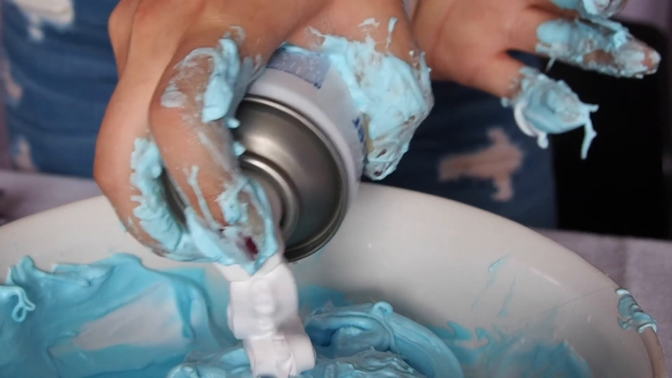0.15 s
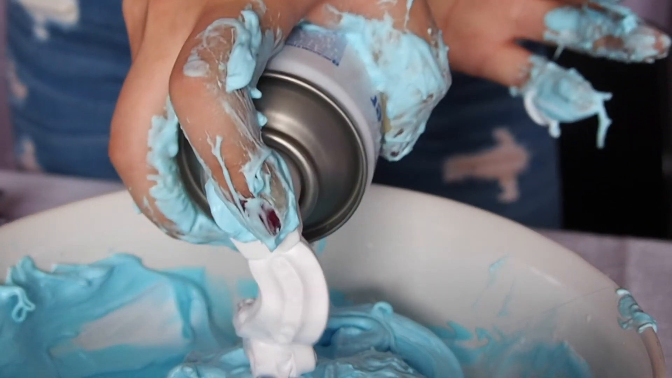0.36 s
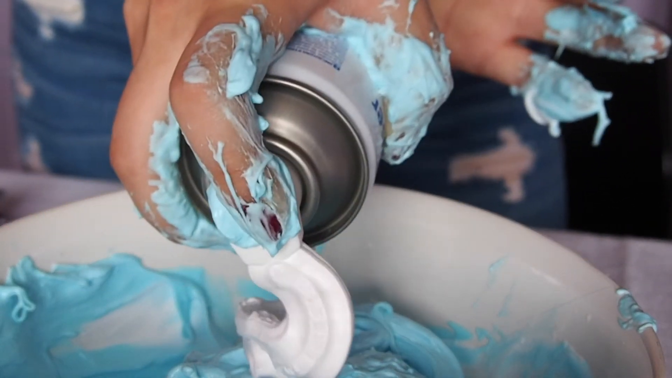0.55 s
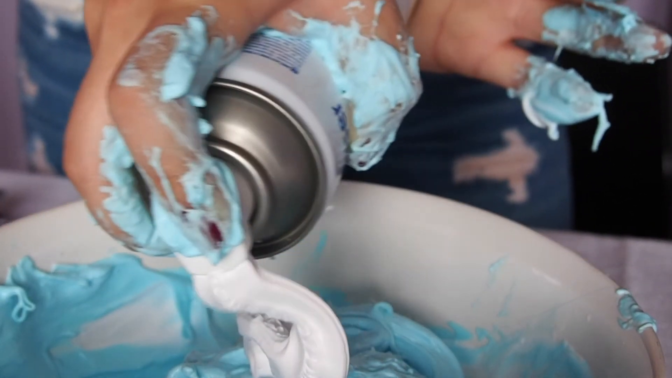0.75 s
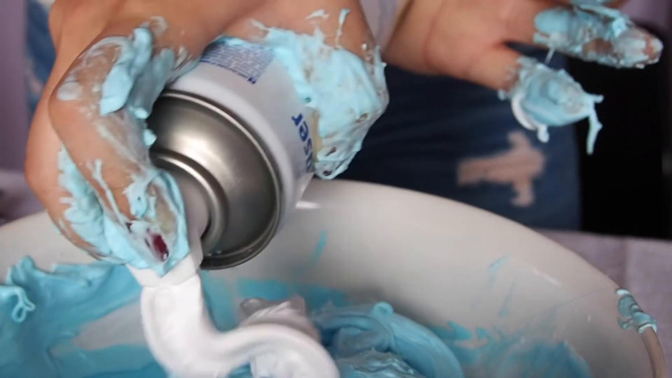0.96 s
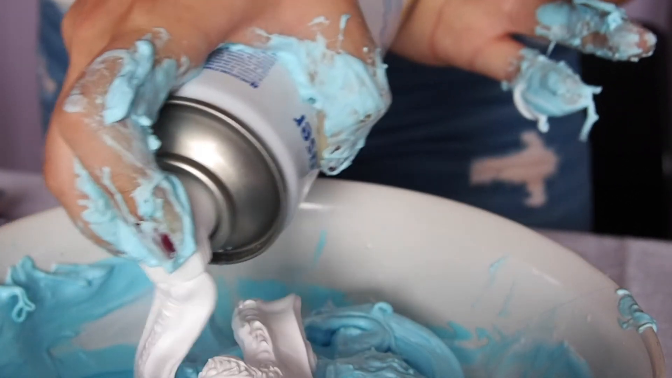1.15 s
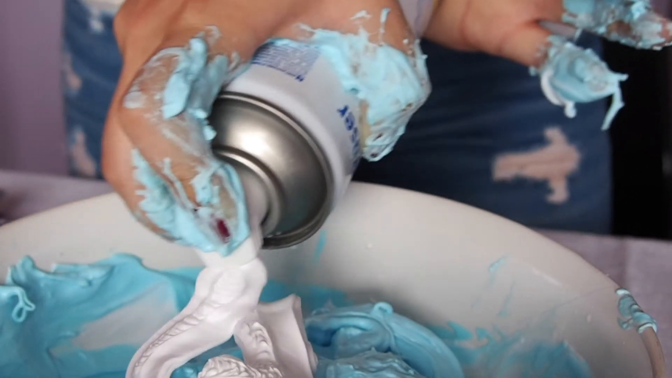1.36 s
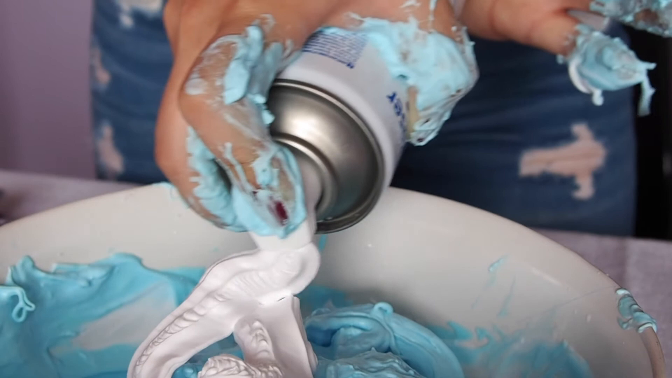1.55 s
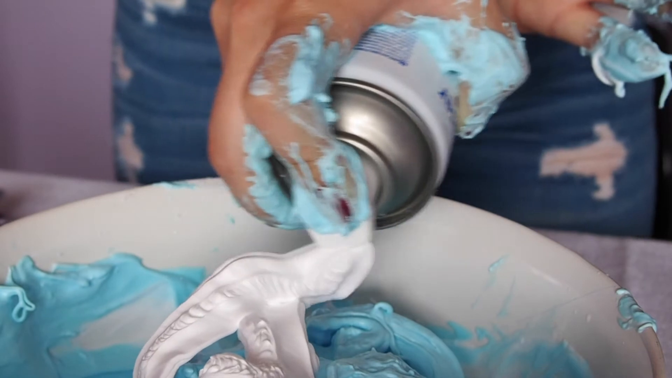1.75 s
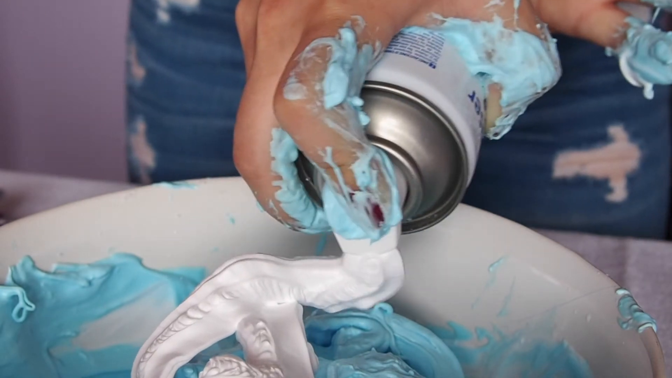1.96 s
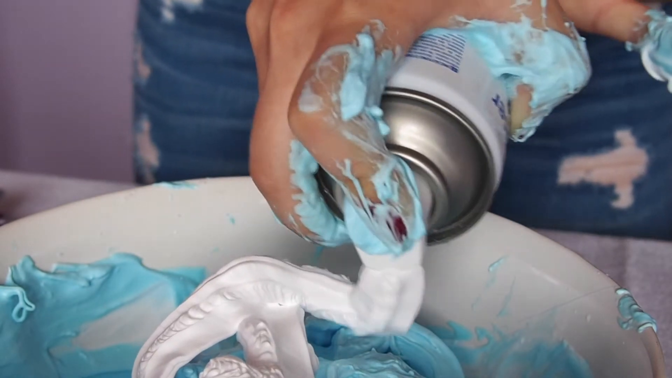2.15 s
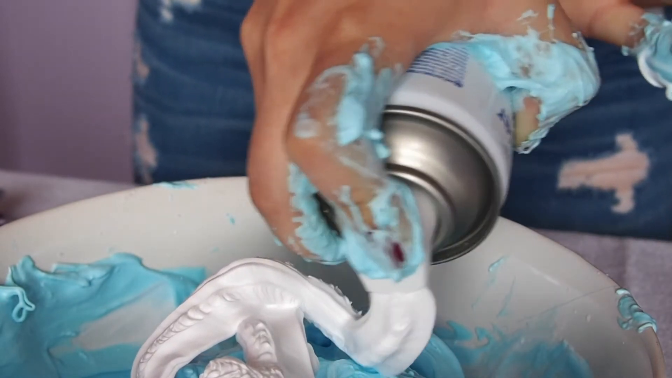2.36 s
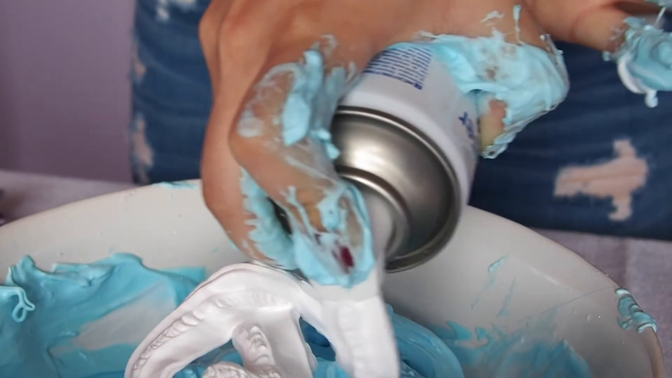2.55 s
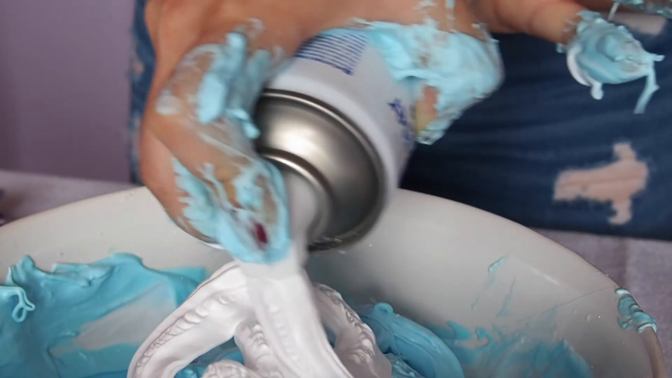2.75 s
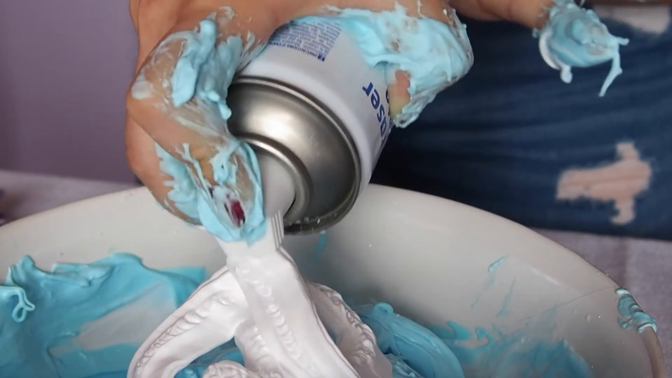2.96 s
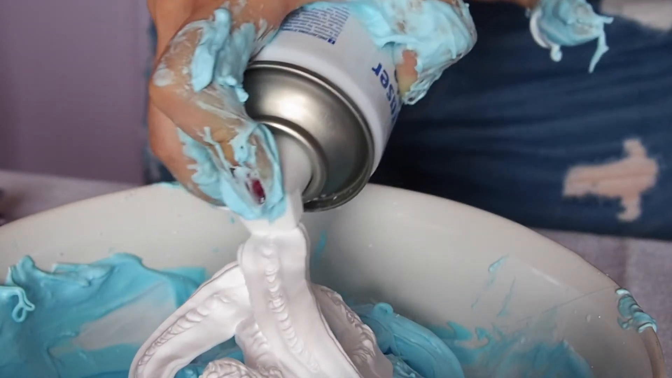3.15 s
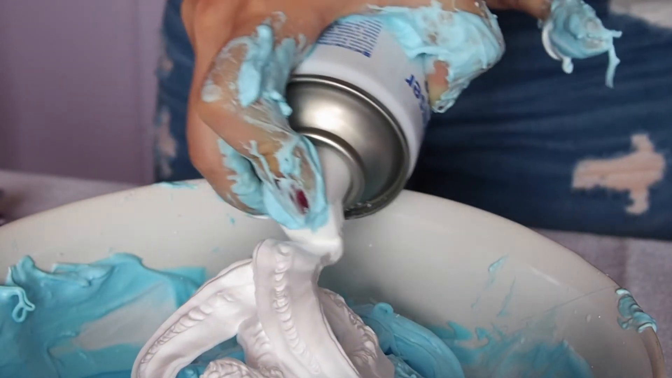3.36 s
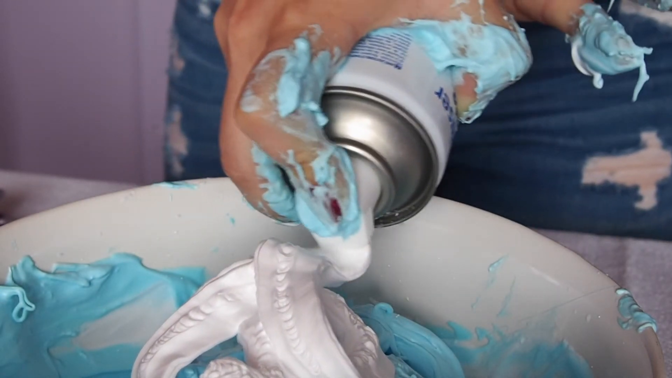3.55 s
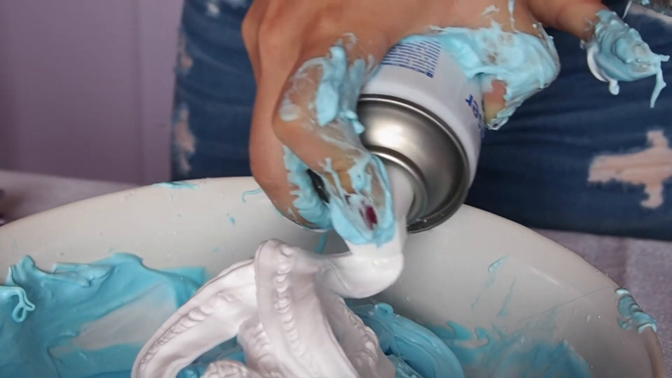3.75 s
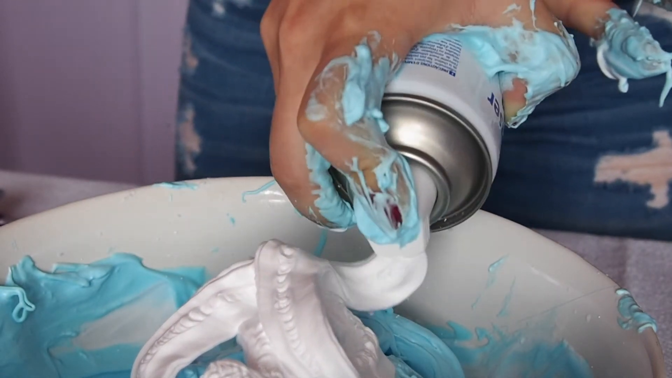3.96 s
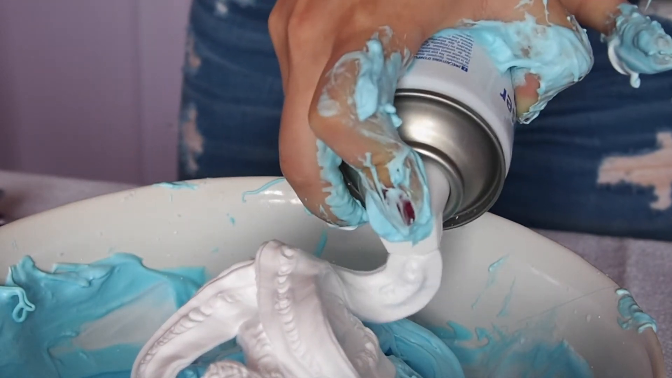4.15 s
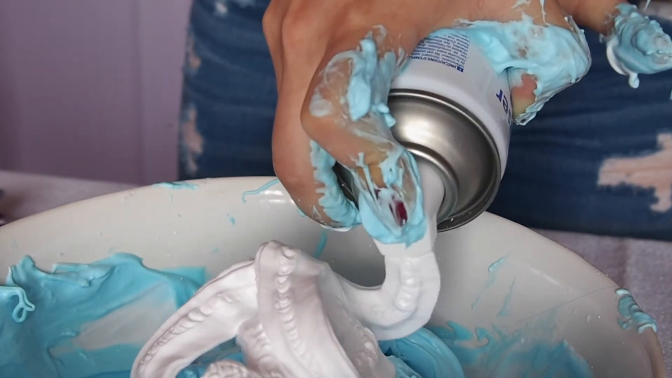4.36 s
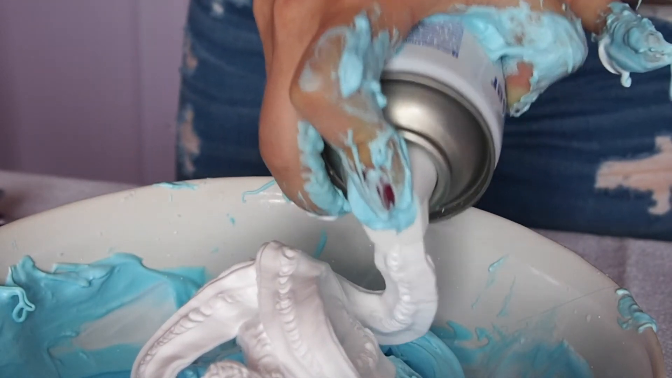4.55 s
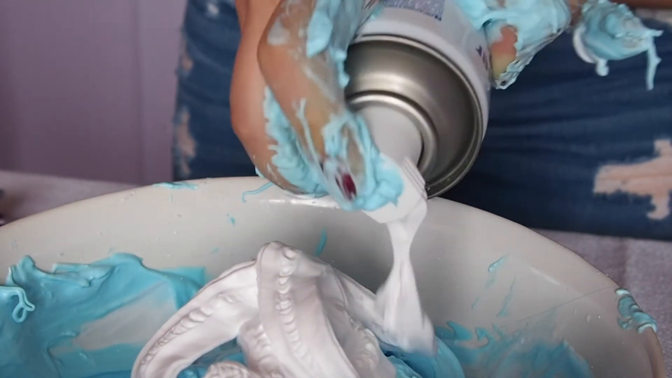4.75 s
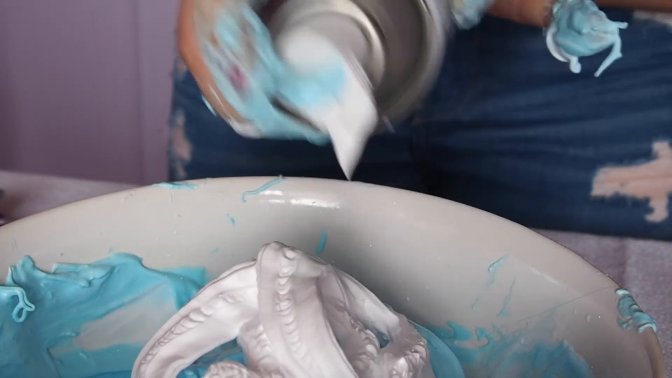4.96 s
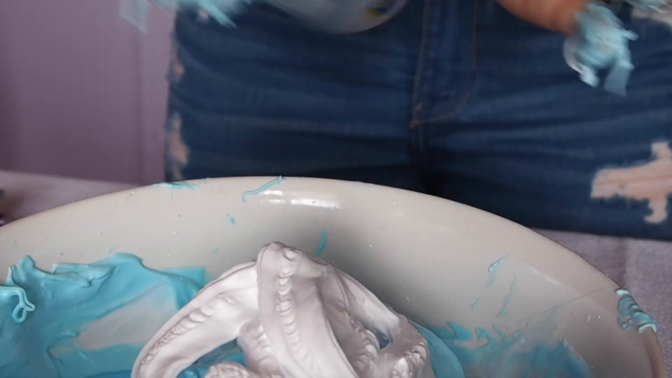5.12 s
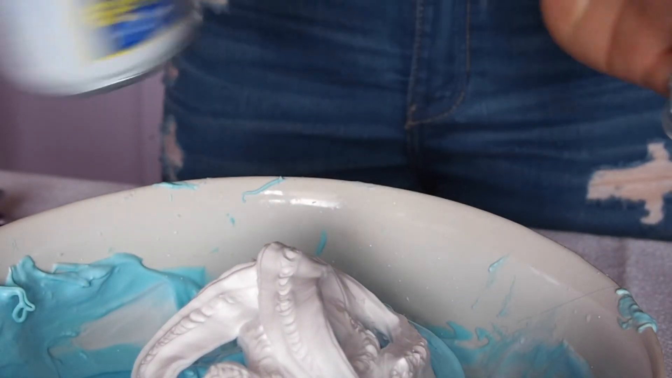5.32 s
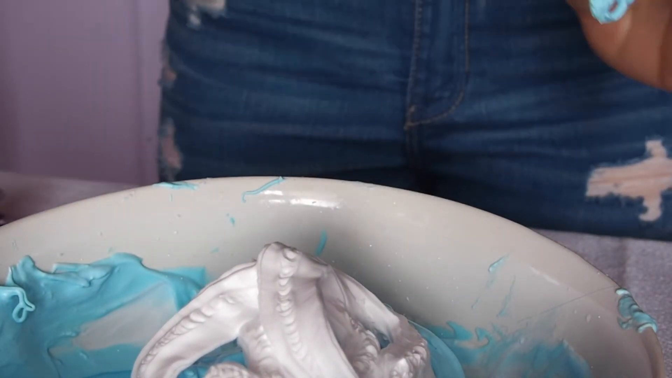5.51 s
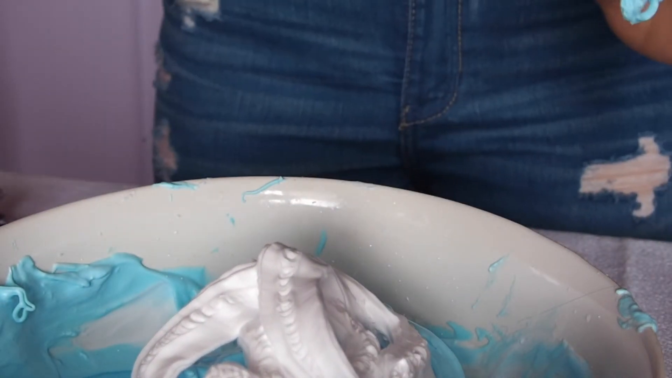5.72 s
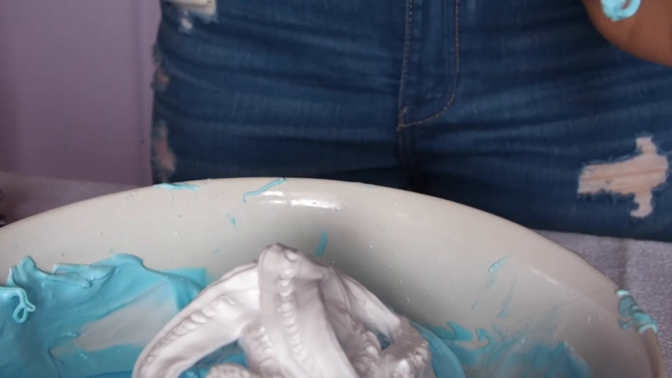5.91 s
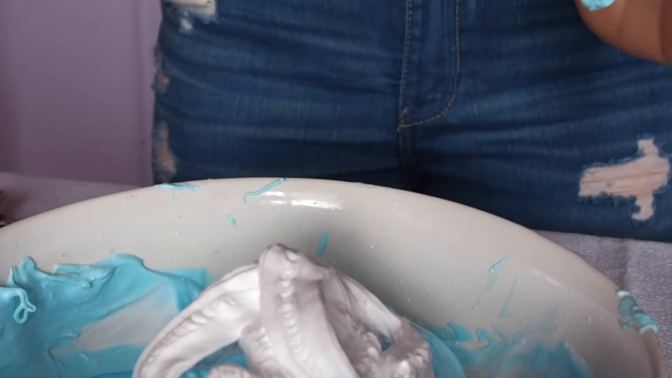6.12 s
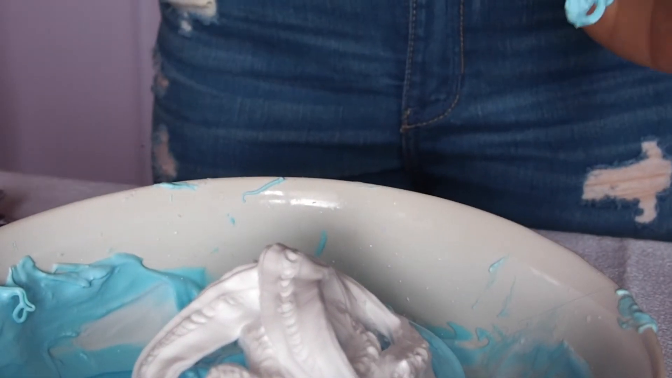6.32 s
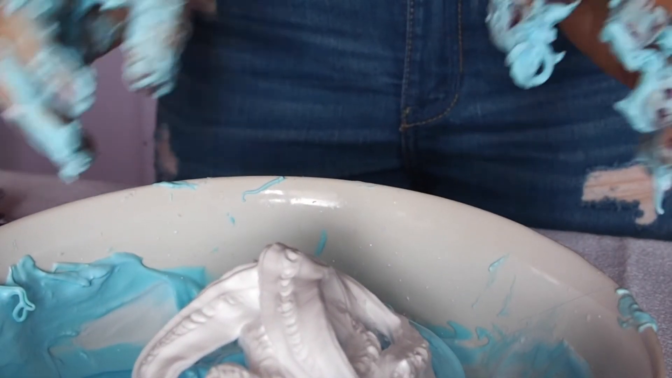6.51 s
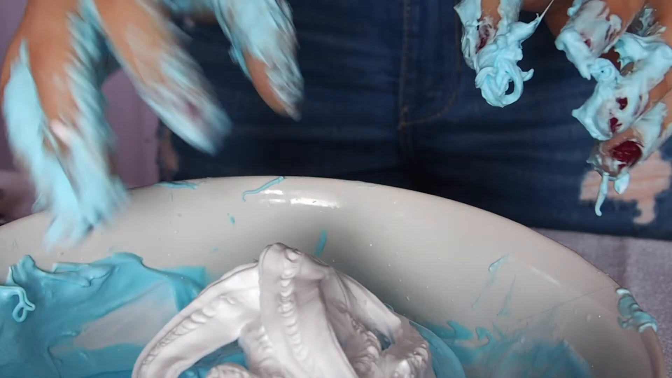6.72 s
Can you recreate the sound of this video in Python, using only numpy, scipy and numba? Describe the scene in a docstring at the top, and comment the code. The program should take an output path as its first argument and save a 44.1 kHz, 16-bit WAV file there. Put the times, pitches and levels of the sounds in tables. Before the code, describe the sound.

Shaving foam sputters loudly from an aerosol can in one long close hiss, stops abruptly, then sticky finger clicks and a dull can thud.

```python
"""In a small room, close by, shaving foam is sprayed from an aerosol can into a bowl.
Noise and bursting bubbles follow the uneven spurts of the valve, whose pace mostly slows.
They ring in gliding resonances of the nozzle, the hand and a hollow closing in the foam.
The spray stops, foamy fingers click and crackle, and the can is set down on the table,
where it thuds and rocks as damped sines. A quiet room tone of coloured noise lies beneath."""
import sys
import numpy as np
from scipy import signal
from scipy.fft import rfft, irfft, next_fast_len
from scipy.io import wavfile
from scipy.ndimage import uniform_filter1d
from numba import njit

SR = 44100
rng = np.random.default_rng(int(sys.argv[2]) if len(sys.argv) > 2 else 0)


def pcm_store(signal):
    """Save signal as 16-bit PCM."""
    levels = np.round(np.clip(np.atleast_2d(signal), -1, 1) * 32767)
    wavfile.write(sys.argv[1], SR, levels.astype(np.int16).T)


N = 298998
TIME = np.arange(N) / SR
SIZE = next_fast_len(N + SR)   # length of the colouring filter, with spare room for its tail
FREQS = np.maximum(np.arange(SIZE // 2 + 1) * SR / SIZE, 1)

# All table levels are relative: gains and filters further on also shape how loud they come out.

# How loud the spray's low body is. Columns: time_s, level_db
BODY_LEVEL = [(0.0, -20.5), (0.06, -26.5), (0.82, -25.5), (3.06, -27), (3.75, -23.5), (4.66, -25.5)]
# How loud the hiss is. Columns: time_s, level_db
HISS_LEVEL = [(0.0, -13), (0.04, -12), (0.05, -17), (0.36, -15.5), (1.07, -18), (1.15, -15), (1.38, -17.5),
              (2.03, -17.5), (2.11, -15), (2.59, -17), (2.93, -14), (3.04, -17.5), (4.48, -17.5),
              (4.68, -14.5)]
# How loud the fine fizz is. Columns: time_s, level_db
FIZZ_LEVEL = [(0.0, -21), (0.08, -24), (0.65, -20.5), (2.93, -21), (3.08, -24), (3.25, -21), (3.26, -23),
              (3.69, -26), (3.84, -20), (4.59, -23.5), (4.65, -15), (4.68, -23)]
# Stereo width of close sounds, also used for the fingers. Columns: pitch_hz, side_against_mid_db
CLOSE_WIDTH = [(200, -42), (600, -21), (1200, -12), (2500, -12.5), (4500, -10), (8000, -3), (14000, -3.5)]
BODY_DB, HISS_DB, FIZZ_DB = -1, 0.22, 0.88   # added to the three level curves
VALVE_SHUT_S, VALVE_CLOSING_S = 4.703, 0.04


def spray(turbulence_db=-1, fizz_flicker_db=1.5):
    """Bursting bubbles and gas noise follow the spurts; the finest fizz flickers on its own."""
    gas = from_db(turbulence_db) * rng.standard_normal((2, N))
    burst = sputter() * (pops(per_s=9000, spread_db=3.0) + gas)
    voiced = reflected(nozzle(burst))

    body_gain = from_db(in_time(BODY_LEVEL)[0] + BODY_DB)
    body = body_gain * evened(band(voiced, 144, 1520))

    hiss_gain = from_db(in_time(HISS_LEVEL)[0] + HISS_DB)
    hiss = hiss_gain * evened(band(voiced, 1810, 6974, order=5))

    fizz_gain = from_db(in_time(FIZZ_LEVEL)[0] + FIZZ_DB)
    flicker = from_db(fizz_flicker_db * drift(250))
    fizz = fizz_gain * evened(band(voiced, 6450, 19700, order=5) * flicker)

    valve = np.clip((VALVE_SHUT_S - TIME) / VALVE_CLOSING_S, 0, 1)
    return ports(stereo((body + hiss + fizz) * valve, CLOSE_WIDTH))


# Pace of the sputtering; the steady flow is set against spurts of power one.
# Columns: time_s, spurts_per_s, timing_unevenness (no unit), steady_flow_db
SPUTTER = [(0, 61, 0.55, 7.5), (.8, 85.6, .45, 5.5), (1.5, 67.3, 0.43, 2.5), (2.2, 67, 0.39, -0.5),
           (2.8, 39.4, 0.31, 0.5), (3.3, 37, 0.191, -1), (4.1, 34.3, 0.22, -0.5), (4.7, 42.8, 0.19, 0)]
# The loudest spits of gas. Columns: start_s, level_db
SPITS = [(0.026, 2), (0.1421, -4), (0.35, 2), (0.47, 0), (0.6497, 0), (0.9323, 1), (1.32, -3), (1.5642, 2),
         (1.8117, 0.5), (1.875, -3), (1.9607, 2), (2.4272, 0.5), (2.6539, 1.5), (2.6889, 1), (2.7821, -3.5),
         (2.9065, -5), (3.1612, 1.5), (3.2211, 1), (3.4245, -2), (3.512, -3), (3.6666, -0.5), (3.8297, 0.5),
         (3.924, -0.5), (4.0454, 1), (4.2694, 0), (4.337, 0.5), (4.5529, -2.5), (4.6794, -3.5)]
SPIT_RISE_S, SPIT_FALL_S = .0009, .0036
SMALL_SPITS_PER_S, SMALL_SPIT_DB, SMALL_SPIT_SPREAD_DB = 30, 5.5, 2.5


def sputter(spurt_spread_db=-1.0, spurt_share=0.22, spit_db=9.5, flutter_db=2.5, tremor_db=0.95):
    """Gas and foam leave in uneven spurts over a steady flow; spits swell and die on top."""
    per_s, uneven, steady_db = in_time(SPUTTER)
    # whole numbers of the cycle count the spurts; the fraction is the age within one
    pace = per_s * np.exp(uneven * drift(70) - uneven ** 2 / 2)
    cycle = np.cumsum(pace) / SR
    spurt_number = cycle.astype(int)
    age = cycle % 1

    strengths = from_db(spurt_spread_db * rng.standard_normal(2000).clip(-2, 1.5))
    rise, fall = 1 - np.exp(-age / 0.23), np.exp(-age / spurt_share)
    spurts = rms_one(strengths[spurt_number] * rise * fall)
    flow = rms_one(np.hypot(from_db(steady_db), spurts))

    # some spurts, chosen at random, begin with a small spit
    starts = np.flatnonzero(np.diff(spurt_number))
    chance = rng.random(N)[:len(starts)]
    size = rng.standard_normal(N)[:len(starts)]
    spitting = chance < SMALL_SPITS_PER_S / per_s[starts]
    small_db = SMALL_SPIT_DB + SMALL_SPIT_SPREAD_DB * np.minimum(size[spitting], 1)
    small = impulses(TIME[starts[spitting]], small_db)
    times, level_db = np.transpose(SPITS)
    large = impulses(times, level_db + spit_db)
    # one fade gives the dying away, the second softens the start
    spits = fade(fade(small + large, SPIT_FALL_S), SPIT_RISE_S) / (SPIT_RISE_S * SR)

    # slugs of liquid chop the jet
    flutter = flutter_db * rms_one(band(rng.standard_normal(N), 69, 264, order=2))
    chop_db = flutter + tremor_db * drift(900)
    return np.hypot(flow, spits) * from_db(np.minimum(chop_db, 5))


def pops(per_s, spread_db):
    """Bubbles of uneven size burst at random: a mid-side pair of click trains."""
    sizes = from_db(spread_db * np.minimum(rng.exponential(1, N), 4))
    bursting = rng.random(N) < per_s / SR
    return rms_one(bursting * sizes * rng.choice([-1, 1], (2, N)))


# Main resonance of the nozzle, gliding as the foam rope bends. Columns: time_s, pitch_hz, level_db
NOZZLE = [(0, 4100, 6.5), (.4, 3970, 8), (.75, 3850, 0), (1.1, 3900, 1.5), (1.42, 4546, -3.5),
          (1.78, 4900, 1.5), (2.13, 4480, 8), (2.45, 3950, 1.5), (2.88, 3820, 5.5), (2.99, 4387, 3),
          (3.17, 4670, 5), (3.5, 5050, 4), (3.9, 4800, -3), (4.5, 4330, -14), (4.63, 4400, 3)]
# Lower resonance of the cupped hand, opened and closed by its tilt. Columns: time_s, pitch_hz, level_db
HAND_LOW = [(0, 2350, 6), (.5, 2170, -2), (.95, 2320, -23), (1.35, 2330, 2), (1.85, 2050, -4),
            (2.2, 2048, -12), (2.7, 1990, -3.5), (3.2, 1980, -0.5), (4.7, 1930, -18)]
# Higher resonance of the cupped hand. Columns: time_s, pitch_hz, level_db
HAND_HIGH = [(0, 3030, -2), (.6, 2670, -1), (1.18, 2840, -4.5), (1.45, 3000, -7), (2.0, 3050, 0),
             (2.6, 2980, 4.5), (2.9, 2660, -7), (3.4, 2830, 4), (4.7, 3160, -4)]
# Thin whistle of gas at the lip of the nozzle. Columns: time_s, pitch_hz, level_db
LIP = [(0, 8960, 5), (.45, 9300, 1.5), (.97, 8600, 4), (1.12, 7440, 0), (1.35, 9100, 5), (1.6, 8400, -3),
       (1.93, 9300, 9), (2.1, 8800, 0), (2.4, 8940, 7), (2.7, 8270, 0), (3.05, 8800, -3), (3.22, 8500, 9),
       (3.4, 9300, -6), (4.7, 8894, 3)]
# Hollow closed around the nozzle by the growing heap of foam. Columns: pitch_hz, level_db (once closed)
HOLLOW = [(1230, 5), (3720, 3), (5950, -1), (7700, -6.5)]
# Fixed resonances of the bowl. Columns: pitch_hz, width_hz, level_db
BOWL = [(560, 110, -5), (720, 130, -1), (904, 130, 1), (1012, 40, -8)]
# Overall colour of the jet. Columns: pitch_hz, level_db
JET = [(100, -13.5), (160, -0.5), (250, -1.5), (400, -11.5), (520, -1), (900, -2), (1100, -5.5), (1450, 0),
       (2000, -1), (3700, 0.5), (6000, 0), (9000, -1.5), (13000, 2), (15800, -8.5)]
HOLLOW_FROM_S, HOLLOW_CLOSING_S, HOLLOW_OPEN_DB = 2.88, 0.71, -18.5


def nozzle(burst, leak_db=-4):
    """Part of the jet leaks straight out; the rest rings in nozzle, hand, foam hollow and bowl."""
    out = from_db(leak_db) * burst
    for track in (NOZZLE, HAND_LOW, HAND_HIGH, LIP):
        out = out + cavity(burst, *in_time(track))
    still_open = 1 - np.clip((TIME - HOLLOW_FROM_S) / HOLLOW_CLOSING_S, 0, 1)
    for hz, db in HOLLOW:
        out = out + cavity(burst, hz, db + HOLLOW_OPEN_DB * still_open)
    for hz, width_hz, db in BOWL:
        out = out + from_db(db) * resonate(burst, hz, width_hz)
    return colour(out, JET)


def cavity(burst, hz, db, wobble=0.031, sharpness=14):
    """A resonance of trapped air that the foam keeps shaking; sharpness is pitch over width."""
    r = np.exp(-np.pi * np.mean(hz) / sharpness / SR)
    angle = 2 * np.pi * hz * (1 + wobble * drift(25)) / SR
    return from_db(db) * np.array([glide(b, angle, r) for b in burst])


# Early reflections off bowl, can and table. Columns: delay_s, level_db
REFLECTIONS = [(.0011, -24), (.0019, -25), (.0031, -19.5), (.0046, -17.5), (.0068, -21)]


def reflected(x, sway=0.035):
    """Nearby surfaces comb the sound; the paths change as the hand moves."""
    out = x.copy()
    for delay_s, db in REFLECTIONS:
        late = TIME - delay_s * (1 + sway * drift(2))
        out += from_db(db) * np.array([np.interp(late, TIME, channel) for channel in x])
    return out


def ports(x, lag_s=9e-6, right_db=.7):
    """The sound reaches the right microphone port a moment later and slightly stronger."""
    lag = np.clip(lag_s * SR, .05, 1.5)
    a = (1 - lag) / (1 + lag)   # an all-pass filter delays by less than one sample
    left = x[0] * from_db(-right_db / 2)
    right = signal.lfilter([a, 1], [1, a], x[1]) * from_db(right_db / 2)
    return np.array([left, right])


# Sticky clicks of fingers and can. Columns: start_s, level_db, lower_edge_hz, upper_edge_hz
CLICKS = [(4.839, -10, 6030, 16000), (5.12, -11.5, 4500, 16000), (5.259, -24, 4000, 12000),
          (5.346, -0.5, 600, 16000), (5.521, -23, 4000, 12000), (5.802, -11, 1500, 5000),
          (5.804, 0.5, 1500, 4060), (6.01, -25, 6000, 16000), (6.177, -27, 6000, 16000),
          (6.189, -24, 6000, 16000), (6.55, -25, 2500, 5000)]
# Colour of the clicks. Columns: pitch_hz, level_db
SNAP = [(300, -28), (1000, -5), (2000, -4), (4000, 0), (6000, 1.5), (9000, -10.5), (14000, -9), (16000, -8)]
# Foam squeezed on the hands. Columns: time_s, level_db
SQUISH = [(4.8, -84.5), (5.08, -64), (5.24, -51), (5.33, -53), (5.55, -60), (5.85, -57), (5.9, -46.5),
          (6.0, -47), (6.1, -56), (6.19, -44), (6.3, -62), (6.78, -76)]


def fingers(crumble_db=-17, crumble_s=0.0015):
    """Sticky skin lets go with a snap and a brief crumble; squeezed foam crackles."""
    snaps = np.zeros((2, N))
    for s, db, low_hz, high_hz in CLICKS:
        click = impulses([s], [db + 5])
        crumble = from_db(crumble_db) * fade(click, crumble_s) * rng.standard_normal((2, N))
        snaps += band(click + crumble, low_hz, high_hz, order=2)
    bubbles = band(pops(per_s=2200, spread_db=4.0), 6600, 14300, order=2)
    crackle = from_db(in_time(SQUISH)[0]) * rms_one(bubbles)
    return stereo(colour(snaps, SNAP) + crackle, CLOSE_WIDTH)


# The can lands and rocks on its rim.
# Columns: start_s, push_on_table_db, shell_ring_db, rim_rattle_db
KNOCKS = [(5.7927, -0.5, -4, -13), (5.828, -9.5, -6, -5), (5.844, -13, 0.5, -8), (5.866, -9.5, -1, -2),
          (5.878, -25, 3, -6), (5.902, -14.5, -18, -4), (5.913, -28, -1, -16), (5.937, -18.5, -13, -3),
          (5.95, -23, 1.5, -24)]
# Tones of the table top. Columns: pitch_hz, level_db, time_to_fall_60_db_s
TABLE = [(89.6, -23, 0.58), (168, -7, 0.42), (200, 5.5, 0.03), (215.3, -11, 0.38), (252, -14, 0.11),
         (372, -27.5, .4), (487, -14, 0.13), (542, -12.5, 0.16), (646, -12, 0.067), (1150, -23, 0.055)]
# Tones of the can's shell. Columns: pitch_hz, level_db, time_to_fall_60_db_s
SHELL = [(400, -26, 0.12), (560, -23.5, 0.14), (687, -34, 0.21), (884.5, -19, 0.14), (950, -42, 0.074),
         (1040, -39, 0.16)]
# Tones of the can's rim. Columns: pitch_hz, level_db, time_to_fall_60_db_s
RIM = [(1314, -38, 0.14), (1750, -29, 0.068), (1784, -28, 0.057), (1998, -31, 0.13), (2120, -42, .05)]


def can_set_down(table_low_hz=95, table_top_hz=900):
    """Knocks of the foamy rim drive the table top, the can's shell and its rim."""
    times, table_db, shell_db, rim_db = np.transpose(KNOCKS)
    table = band(ring(impulses(times, table_db), TABLE), table_low_hz, table_top_hz, order=2)
    shell = band(ring(impulses(times, shell_db), SHELL), 320, 1110)
    rim = band(ring(impulses(times, rim_db), RIM), 1100, 1780)
    return (table + shell + rim) * np.ones((2, 1))


# Stereo width of the room's reflections. Columns: pitch_hz, side_against_mid_db
ROOM_WIDTH = [(150, -16), (600, -14), (1500, -8.5), (4000, 2)]
ROOM_T60_S = 0.55   # time the reflections take to fall by 60 dB


def room(x):
    """Diffuse reflections that die away, wider in the treble."""
    t = TIME[:int(ROOM_T60_S * SR)]
    decay = np.exp(-np.log(1000) * t / ROOM_T60_S)
    tail = rng.standard_normal((2, SR))[:, :len(t)] * decay * (t > .004)
    tail /= np.sqrt(np.sum(tail ** 2))
    wet = signal.fftconvolve(x.mean(axis=0)[None], tail, axes=1)[:, :N]
    spectrum = [(300, 4.0), (1500, 7.5), (5000, -5.5), (9000, -0.5), (15000, -5)]   # pitch_hz, level_db
    return stereo(colour(wet, spectrum), ROOM_WIDTH)


# Colour of the room tone. Columns: pitch_hz, level_db
ROOM_TONE = [(20, -20), (55, -15.5), (95, -3), (125, -4.5), (165, -6.5), (205, 2.5), (280, -12.5),
             (500, -10.5), (1000, -13.5), (1480, -14.5), (1700, -22.5), (5500, -26.5), (9000, -34.5),
             (15500, -38.5)]
# Stereo width of the room tone. Columns: pitch_hz, side_against_mid_db
ROOM_TONE_WIDTH = [(30, -6), (90, -6.5), (200, -13), (500, -7.5), (1200, -6), (3000, 1)]
ROOM_TONE_DB = -41


def room_tone():
    """The steady hum of the room: noise, strongest in the bass."""
    noise = rms_one(colour(rng.standard_normal((2, N)), ROOM_TONE))
    return from_db(ROOM_TONE_DB) * stereo(noise, ROOM_TONE_WIDTH)


def from_db(db):
    """Decibels to gain."""
    return 10 ** (np.asarray(db) / 20)


def rms_one(x):
    """Scale to unit power."""
    return x / np.sqrt(np.mean(x ** 2) + 1e-20)


def in_time(rows):
    """The columns of a curve at every sample."""
    s, *columns = np.transpose(rows)
    return [np.interp(TIME, s, c) for c in columns]


def evened(x, span_s=0.18):
    """Divide a mid-side pair by the slow level of its mid, keeping the fast flutter."""
    power = uniform_filter1d(x[0] ** 2, int(span_s * SR))
    return x / np.sqrt(np.maximum(power, 1e-12))


def drift(per_s):
    """Random wandering of unit power, with per_s new values a second joined by lines."""
    knots = rng.standard_normal(N // 40)
    return rms_one(np.interp(TIME * per_s, np.arange(len(knots)), knots))


def colour(x, spectrum):
    """Filter with the given spectrum that responds at once (minimum phase)."""
    hz, db = np.transpose(spectrum)
    gain = from_db(np.interp(np.log(FREQS), np.log(hz), db))
    # folding the cepstrum forward in time gives the minimum phase
    cepstrum = irfft(np.log(gain), SIZE)
    cepstrum[1:SIZE // 2] *= 2
    cepstrum[SIZE // 2 + 1:] = 0
    return irfft(rfft(x, SIZE) * np.exp(rfft(cepstrum)), SIZE)[..., :N]


def band(x, low_hz, high_hz, order=3):
    """Butterworth band-pass."""
    edges = [low_hz, min(high_hz, SR / 2 - 500)]
    return signal.sosfilt(signal.butter(order, edges, "band", fs=SR, output="sos"), x + 1e-18)


def impulses(times, db):
    """One click for each event."""
    out = np.zeros(N)
    out[np.round(np.asarray(times) * SR).astype(int).clip(0, N - 1)] = from_db(db)
    return out


def fade(clicks, decay_s):
    """Each click leaves an exponential tail of its own height."""
    return signal.lfilter([1], [1, -np.exp(-1 / (decay_s * SR))], clicks + 1e-18)


def ring(clicks, modes):
    """Clicks set damped sines ringing."""
    out = np.zeros(N)
    for hz, db, t60 in modes:
        r = np.exp(-np.log(1000) / (t60 * SR))
        w = 2 * np.pi * hz / SR
        out += signal.lfilter([0, from_db(db) * np.sin(w)], [1, -2 * r * np.cos(w), r * r], clicks + 1e-18)
    return out


@njit
def glide(x, angle, r):
    """A resonance whose centre moves, gain about one on top."""
    y = np.zeros_like(x)
    for i in range(2, len(x)):
        push = (1 - r * r) / 2 * (x[i] - x[i - 2])
        y[i] = push + 2 * r * np.cos(angle[i]) * y[i - 1] - r * r * y[i - 2]
    return y


def resonate(x, hz, width_hz):
    """A fixed resonance, gain one on top."""
    return signal.lfilter(*signal.iirpeak(hz, hz / width_hz, fs=SR), x)


def stereo(pair, width):
    """Mid and side to left and right."""
    return pair[0] + colour(pair[1], width) * np.array([[1], [-1]])


ROOM_DB, THUD_ROOM_DB = -7.5, -11   # how strongly close sounds and the thuds feed the room


def scene():
    """Spray, hands and can, with their reflections, over the hum of the room."""
    close, thud = spray() + fingers(), can_set_down()
    air = room_tone()
    return close + thud + room(from_db(ROOM_DB) * close + from_db(THUD_ROOM_DB) * thud) + air


# Dips in the microphone's response. Columns: pitch_hz, width_hz, level_db
MIC_NOTCHES = [(1588, 114, -3.5), (6590, 670, -17), (10510, 1570, -11)]
CUTOFF_HZ = 15900


def record(dry):
    """The microphone has three notches, overloads at full scale and loses the very top."""
    for hz, width_hz, db in MIC_NOTCHES:
        dry = dry - (1 - from_db(db)) * resonate(dry, hz, width_hz)
    low_pass = signal.ellip(10, .1, 70, CUTOFF_HZ, fs=SR, output="sos")
    return signal.sosfilt(low_pass, np.clip(dry, -1, 1))


dry = scene()
out = record(dry)
pcm_store(out)
```